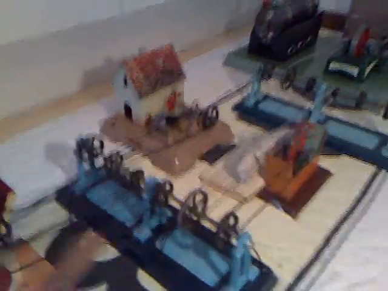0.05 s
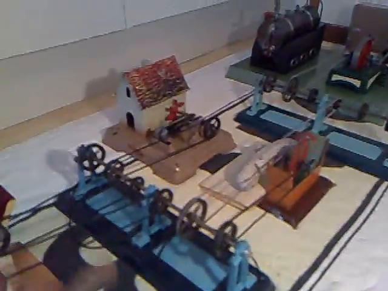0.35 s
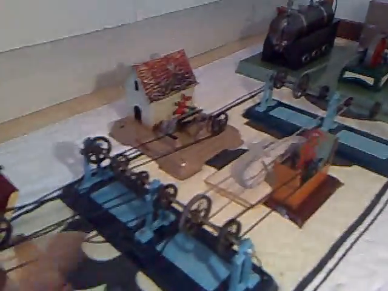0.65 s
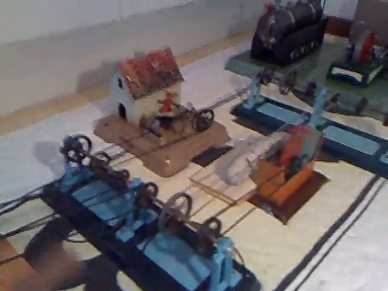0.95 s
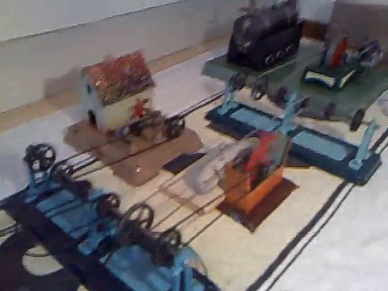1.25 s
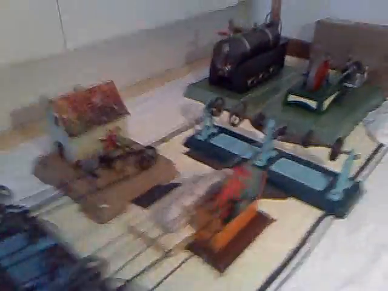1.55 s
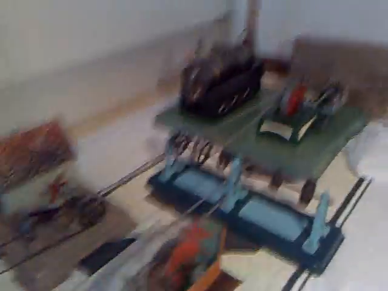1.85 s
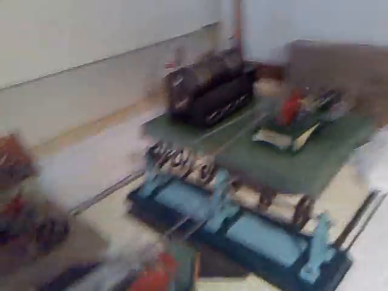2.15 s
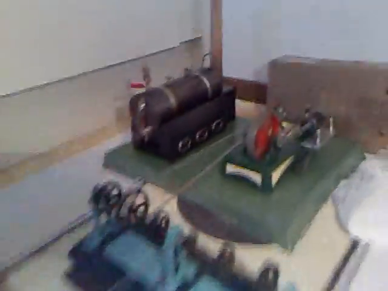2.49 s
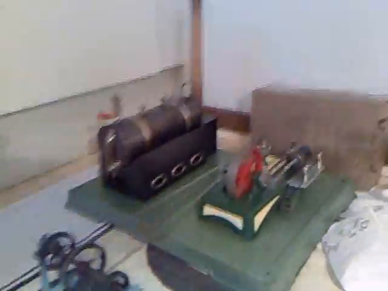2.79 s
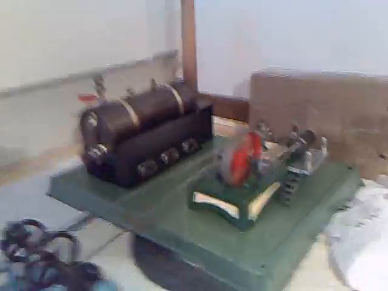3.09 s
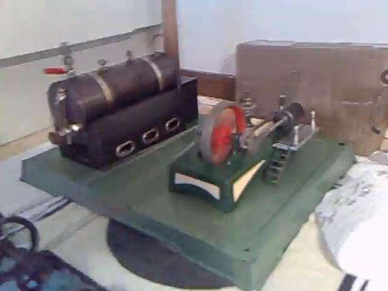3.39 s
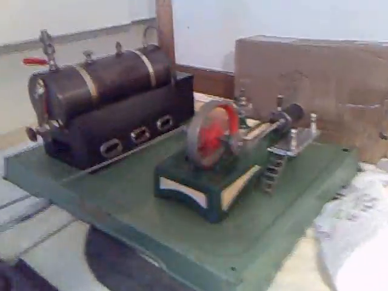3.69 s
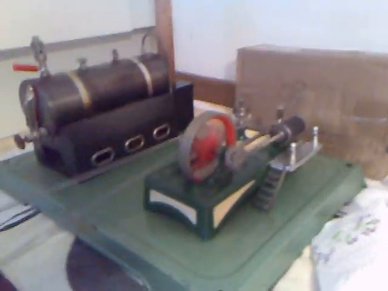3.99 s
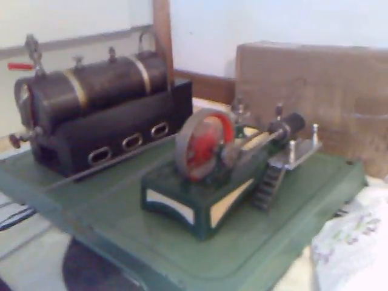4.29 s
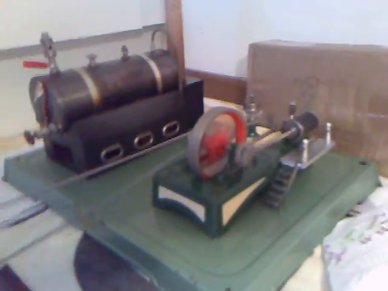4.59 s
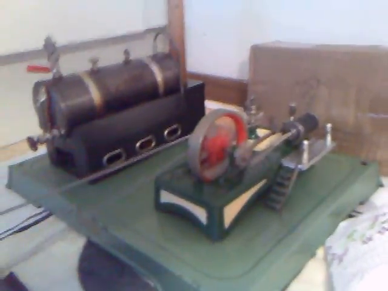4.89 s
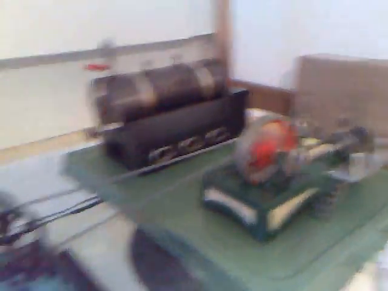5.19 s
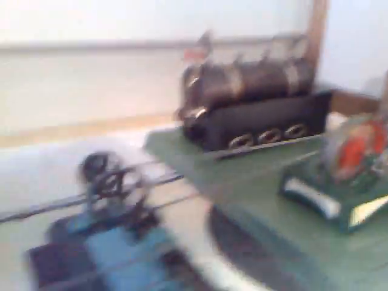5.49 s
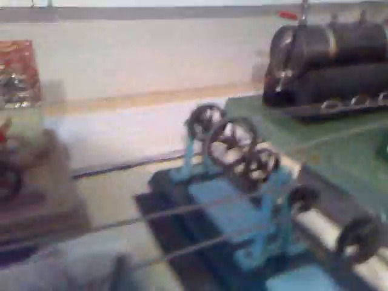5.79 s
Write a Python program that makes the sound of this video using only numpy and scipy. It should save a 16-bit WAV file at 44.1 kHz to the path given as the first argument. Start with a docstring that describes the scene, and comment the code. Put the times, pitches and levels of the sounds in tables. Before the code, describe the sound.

A toy steam engine runs throughout, about fifteen strokes a second, in a small room with short reflections. Each stroke combines a hollow knock on a metal base plate, a short wet spit of steam, a light brass clink and a faint, thin return puff, merging into a fast, even chatter. Loose tin on the workshop models clatters in time, while belts and pulleys tick and rustle softly underneath. For the first three seconds the microphone is among the models, a little away from the engine; a belt gives a brief rattle at about 1.3 seconds. Around 3 seconds the microphone moves beside the engine, and the knocking and steam become clearly louder. A loose metal part now buzzes with each turn, with small clanks near 3.2 and 3.4 seconds and a harder jolt at 4.1. The pace holds to the end, near 6 seconds.

```python
"""A toy steam engine turns about 15 times a second, driving line shafts and tin workshop models by belts.
Each turn gives a light knock, a spit of steam with a heavy knock that rings the base plate, and a weak
return puff. The strokes set brass clinking and loose tin clattering; pulleys rattle underneath.
In a small room, the microphone starts among the models and moves in beside the engine at about 3 s."""
import sys
import numpy as np
from scipy import signal
from scipy.io import wavfile

SR = 44100
rng = np.random.default_rng(int(sys.argv[2]) if len(sys.argv) > 2 else 0)


def dump(signal):
    """Clip the signal to [-1, 1] and save it as 16-bit WAV at the path in sys.argv[1]."""
    limited = np.clip(np.atleast_2d(signal).T, -1, 1)
    pcm = np.round(limited * 32767).astype(np.int16)
    wavfile.write(sys.argv[1], SR, pcm)


N = 257984
TIME = np.arange(N) / SR
TURN_COUNT = 86


def amp(db):
    return 10 ** (np.asarray(db) / 20)

def value_at(points, hz):
    """Join the points by straight lines on a log-frequency axis."""
    point_hz, value = np.transpose(points)
    return np.interp(np.log(hz + 1), np.log(point_hz + 1), value)

def ring(x, response):
    return signal.oaconvolve(x, response)[:N]

def high_pass(x, hz):
    return signal.sosfilt(signal.butter(3, hz, "high", fs=SR, output="sos"), x)

def colour(x, spectrum, size=4096):
    """Causal filter of unit energy: the spectrum sets only the tone colour."""
    log_gain = np.log(amp(value_at(spectrum, abs(np.fft.fftfreq(size, 1 / SR)))))
    minimum_phase = np.exp(np.conj(signal.hilbert(log_gain)))
    taps = np.fft.ifft(minimum_phase).real[:size // 2]
    return ring(x, taps / np.linalg.norm(taps))

def blows(start_s, level_db):
    """Single pushes at the given times."""
    at = np.round(start_s * SR).astype(int)
    inside = (at >= 0) & (at < N)
    return np.bincount(at[inside], amp(level_db)[inside], N)

def scatter(spread):
    """One random value for each turn."""
    return spread * rng.standard_normal(TURN_COUNT)

def burst(peak_s, sharpness, samples=SR // 10):
    """An envelope that swells to 1 at peak_s and dies away."""
    age = TIME[:samples] / peak_s
    return (age * np.exp(1 - age)) ** sharpness

def grains(per_s, spread_db):
    """Random tiny impacts of uneven size, at unit RMS."""
    size = amp(spread_db * np.minimum(rng.exponential(1, N), 4)) * rng.choice([-1, 1], N)
    impacts = size * (rng.random(N) < per_s / SR)
    return impacts / np.sqrt(np.mean(impacts ** 2) + 1e-20)


# The microphone's path: time_s, nearness
MIC_PATH = [(0, 0.041), (1.4, 0.15), (2.2, 0.076), (2.8, 0.032), (3.1, 0.43), (3.4, 1), (4.1, 0.96),
            (5.0, 0.88), (5.4, 0.77), (5.85, 0.93)]
def nearness(time_s):
    """Where the microphone is: 0 (far) among the models, 1 (near) beside the engine."""
    return np.clip(np.interp(time_s, *np.transpose(MIC_PATH)), 0, 1)

# Decay of the small room: frequency_hz, t60_s
ROOM_DECAY = [(200, 0.17), (700, 0.13), (2000, 0.16), (7000, 0.3), (16000, 0.076)]
def room(x, wet_db, first_s=0.0018, count=3):
    """Dense reflections, each band dying at its own speed; their pattern shifts in a one-second cycle."""
    shape = (count, SR // 2)
    reflections = rng.standard_normal(shape) * (rng.random(shape) < 4000 / SR)
    reflections *= TIME[:SR // 2] > first_s
    hz, t, bands = signal.stft(reflections, SR, nperseg=256)
    tails = signal.istft(bands * amp(-60 * t / value_at(ROOM_DECAY, hz)[:, None]), SR)[1]
    shares = np.sqrt(2 / count) * np.cos(2 * np.pi * (TIME + np.arange(count)[:, None] / count))
    wet = sum(ring(x * share, tail / np.linalg.norm(tail)) for share, tail in zip(shares, tails))
    return x + amp(wet_db) * wet

# The room's own noise: frequency_hz, gain_db
AIR_SPECTRUM = [(20, 14.5), (85, -27), (130, -21), (180, 11), (225, 0), (300, 0), (2000, -22), (16000, -12)]
def room_tone(hum_hz=51.5):
    """Low room noise and a faint mains hum, a little louder beside the engine."""
    air = amp(-77) * colour(rng.standard_normal(N), AIR_SPECTRUM)
    hum = amp(-90) * np.sqrt(2) * np.sin(2 * np.pi * hum_hz * TIME)
    return (air + hum) * amp(-2 + 3.3 * nearness(TIME))

# Pulleys on the line shafts: frequency_hz, gain_db
PULLEY_SPECTRUM = [(100, -26), (180, -16.5), (305, -17), (345, -4), (400, -2.5), (480, 5), (720, 4),
                   (790, -2.5), (1400, -2), (3200, -8), (7000, -10), (8800, -23), (12800, -25.5),
                   (13700, -13), (14500, -36)]
# A belt snatches and a pulley rattles on: start_s, level_db
BELT_SNATCHES = [(1.326, -46), (1.39, -54), (3.436, -62), (4.114, -53)]
def pulleys():
    """Belts and dry bearings of the line shafts tick and rustle without pause."""
    rubbing = amp(-57.5 + 5.7 * nearness(TIME))
    snatches = ring(blows(*np.transpose(BELT_SNATCHES)), burst(peak_s=0.0058, sharpness=2.3))
    ticks = grains(per_s=1500, spread_db=2.5) * (rubbing + snatches)
    return room(colour(ticks, PULLEY_SPECTRUM), wet_db=-1.5)

# Each belt-driven shaft loads the engine once per revolution: period_turns, heaviest_turn
SHAFT_LOADS = [(4.531, .02), (3.003, 1.19)]
# Slow drift in how hard the engine works: time_s, steam_db, knock_db
ENGINE_EFFORT = [(0, -2.5, -1.5), (.65, 0, -0.5), (.9, -0.5, -2.5), (1.4, -1.7, -0.5), (1.75, -4.5, 1.5),
                 (1.95, 0, -3.5), (2.45, -1, 1.5), (3.1, -1, 0.2), (3.45, 0, -2), (3.7, -3.8, -2),
                 (3.95, 1.5, .3), (5.85, 0.7, 0.5)]
# How hard a turn drives each sound: far_db, near_gain_db, load_share, scatter_db
EXHAUST_DRIVE = (-46, 7.5, 1.49, 0.78)
KNOCK_DRIVE = (-40, 8, 0.48, 1.65)
CLATTER_DRIVE = (-49.5, 7.5, .5, 0.25)
# The engine jolts or falters: time_s, extra_steam_db, extra_knock_db, extra_clatter_db
JOLTS = [(.08, 3, -0.5, 0), (.77, -.5, 0, 3), (.84, .8, 1, 3), (1.04, -3.5, -1.5, -1), (1.11, 0.5, -1.5, 2),
         (1.32, 4.5, 1, -3), (2.34, 5, -1, 4.5), (2.47, 5.5, 2.5, 0), (2.68, 6.5, 3.5, -11),
         (2.95, 5, 4.5, -3.5), (3.02, 5, 2, 0), (3.43, 1.5, -1.5, 3.5), (4.10, 5, 5.5, 7.5),
         (4.24, -5.5, 1, -3), (4.64, 2, 1, -1.5), (4.57, -2.5, 2, -4), (4.98, -3, -0.5, 3),
         (5.11, -3, 0, -2), (5.18, 1.5, 3, 4.5)]
def strokes(first_s=0.0144, turns_per_s=14.5644, turns_per_s2=0.05578, uneven_s=0.00036):
    """The flywheel slowly gathers speed: each stroke's time and its steam, knock and clatter in dB."""
    turn = np.arange(TURN_COUNT)
    speed = np.sqrt(turns_per_s ** 2 + 2 * turns_per_s2 * turn)
    stroke_s = first_s + (speed - turns_per_s) / turns_per_s2
    load_db = 0.8 * sum(np.cos(2 * np.pi * (turn - heaviest) / period)
                        for period, heaviest in SHAFT_LOADS)
    drives = (EXHAUST_DRIVE, KNOCK_DRIVE, CLATTER_DRIVE)
    levels = np.array([far_db + gain_db * nearness(stroke_s) + share * load_db + scatter(scatter_db)
                       for far_db, gain_db, share, scatter_db in drives])
    effort_s, *efforts = np.transpose(ENGINE_EFFORT)
    steam_db, knock_db = (np.interp(stroke_s, effort_s, effort) for effort in efforts)
    levels += [steam_db, knock_db, 1.1 * steam_db]  # the clatter follows the steam
    for time_s, *extra_db in JOLTS:
        levels[:, np.argmin(abs(stroke_s - time_s))] += extra_db
    return stroke_s + scatter(uneven_s), *levels

# The knocks within one turn: delay_s, push_db, shake_db
TURN_KNOCKS = [(-.0082, -12, -5), (.0033, 0, 0), (.0206, -13.5, -9), (.036, -30, -14)]
def knocks(stroke_s, knock_db, table_hz=115):
    """Play in the crank bearing and linkage: light knocks around the heavy one as the piston reverses."""
    push = sum(blows(stroke_s + delay_s + scatter(0.0001), knock_db + push_db + scatter(0.5))
               for delay_s, push_db, _ in TURN_KNOCKS)
    table_top = burst(peak_s=0.0025, sharpness=1.3) * np.sin(2 * np.pi * table_hz * TIME[:SR // 10])
    ringing = room(base_plate(push), wet_db=-19, first_s=0.012)
    return amp(-7) * ringing + amp(-37.5) * ring(push, table_top)

# Base plate and table, heard from among the models: pitch_hz, level_db, peak_s
FAR_PLATE = [(352.7, -21, 0.03), (448.6, -10, 0.021), (504.2, 0.5, 0.012), (539, -0.5, 0.0059),
             (575, -4.5, 0.0034), (711, -9.5, 0.019), (904.6, -2.5, 0.0052), (1000, -11.5, 0.01),
             (1281, -12.5, 0.013), (1765, -11.5, 0.0054), (2410, -31, 0.0035)]
# Base plate, microphone beside the engine: pitch_hz, level_db, peak_s
NEAR_PLATE = [(357.9, -9, 0.018), (472.3, -8, 0.027), (502.5, 3, 0.0048), (585, 2.5, 0.0041),
              (691.4, -10, 0.012), (704.5, -13.5, 0.027), (902, -3, 0.0057), (1026, -17, 0.0063),
              (1343, -23, 0.014), (1366, -21.5, 0.023), (1632, -11.5, 0.0057), (2460, -40, 0.013)]
def base_plate(push):
    """Each mode builds up as the bending wave spreads over the plate, then dies away."""
    near = nearness(TIME)
    ringing = np.zeros(N)
    for share, modes in ((1 - near, FAR_PLATE), (near, NEAR_PLATE)):
        response = sum(amp(db) * burst(peak_s, 1.5, SR // 5) * np.sin(2 * np.pi * hz * TIME[:SR // 5])
                       for hz, db, peak_s in modes)
        ringing += ring(push * share, response)
    return high_pass(ringing, hz=224)  # so small a plate radiates no bass

# Loose tin on the models and on the engine, each from close by: frequency_hz, gain_db
MODEL_TIN = [(250, -33), (480, -1), (790, -13), (900, -5.5), (1220, 0.5), (1302, 6), (1400, -2), (1800, -2),
             (2150, -17.5), (2370, -1), (2650, -4.5), (3400, -11.5), (4400, -6), (14000, -21.5)]
ENGINE_TIN = [(250, -30), (480, -1), (790, -18.5), (900, 13.5), (1150, -5), (1410, 10.5), (1560, -3),
              (1800, 1.5), (2150, -8), (2490, -3.5), (3200, -5.5), (4300, -5.5), (6000, -14), (14000, -41)]
def tin_clatter(stroke_s, clatter_db):
    """Each knock shakes loose tin parts into a brief flurry of contacts."""
    shake = sum(blows(stroke_s + delay_s - 0.0022 + scatter(0.00025), clatter_db + shake_db + scatter(1))
                for delay_s, _, shake_db in TURN_KNOCKS)
    contacts = ring(shake, burst(peak_s=0.0026, sharpness=1)) * grains(per_s=2800, spread_db=2.5)
    near = nearness(TIME)
    tin = colour(contacts * (1 - near), MODEL_TIN) + amp(0.5) * colour(contacts * near, ENGINE_TIN)
    return room(high_pass(tin, hz=650), wet_db=-2)

# Steam at the exhaust port: frequency_hz, gain_db
STEAM_SPECTRUM = [(200, -62), (900, -43), (2000, -4), (3200, -8), (4300, -4), (4800, -7.5), (5200, 2),
                  (5600, -2.5), (6700, 3), (7600, -0.5), (8700, -12.5), (11000, -17), (13700, -18),
                  (16000, -26)]
def exhaust(stroke_s, steam_db):
    """The port opens once a turn and spits wet steam."""
    openings = blows(stroke_s - 0.0003 + scatter(0.0013), steam_db)
    flow = ring(openings, burst(peak_s=0.0052, sharpness=2.33))
    steam = amp(1.5) * colour(flow * grains(per_s=14000, spread_db=1), STEAM_SPECTRUM)
    return room(steam, wet_db=-6.5, first_s=0.0032)

# A loose part on the engine, from close by: frequency_hz, gain_db
CLANK_SPECTRUM = [(700, -57), (1150, -14.5), (1340, -3.5), (1430, 0.5), (1560, -16.5), (2200, -39.5)]
# Its hard swings: start_s, level_db
HARD_SWINGS = [(3.232, -5), (3.43, -2), (3.452, -7.5), (4.125, -3)]
def clank(stroke_s, clatter_db):
    """A loose part on the engine buzzes with every turn and now and then swings hard against its seat."""
    buzz = ring(blows(stroke_s, clatter_db + 28.5), burst(peak_s=0.011, sharpness=0.9))
    swings = ring(blows(*np.transpose(HARD_SWINGS)), burst(peak_s=0.0078, sharpness=1))
    contacts = (buzz + swings) * nearness(TIME) * grains(per_s=3000, spread_db=1.5)
    return amp(-40.5) * colour(contacts, CLANK_SPECTRUM)

# Cylinder and steam pipe, from the models and from beside the engine: pitch_hz, far_db, near_db
BRASS_RING = [(2330, 0, -14), (2463, -31, -3), (4290, -14, 2.5), (4510, 1, -17), (5070, -4, 3.5),
              (6020, 1, -5), (6270, 6, -19), (6580, -11, 5.5), (6840, -10, 4), (7530, -4, -0.5)]
def brass_clink(stroke_s, steam_db, rise_s=0.0023, t60_s=0.045):
    """Each stroke sets the brass ringing briefly, its modes a little differently every time."""
    t, near = TIME[:SR // 10], nearness(stroke_s)
    envelope = (1 - np.exp(-t / rise_s)) * amp(-60 * t / t60_s)
    ringing = np.zeros(N)
    for hz, far_db, near_db in BRASS_RING:
        strike_db = steam_db + far_db + (near_db - far_db) * near + scatter(2.5)
        ringing += ring(blows(stroke_s + 0.002, strike_db), envelope * np.sin(2 * np.pi * hz * t))
    return amp(-5) * ringing

# Steam slipping past the valve: frequency_hz, gain_db
LEAK_SPECTRUM = [(500, -38), (3000, -11.5), (7000, 8.5), (8800, -9), (11000, 0), (13700, -8), (16000, -4.5)]
def valve_leak(stroke_s):
    """On the return stroke a thin, bright puff escapes past the valve."""
    puffs = blows(stroke_s + 0.037 + scatter(0.00086), -57 + 3.9 * nearness(stroke_s) + scatter(1.8))
    flow = ring(puffs, burst(peak_s=0.0056, sharpness=4.3))
    return room(colour(flow * rng.standard_normal(N), LEAK_SPECTRUM), wet_db=-20)


def scene():
    """Engine, models and room at one moving microphone."""
    stroke_s, steam_db, knock_db, clatter_db = strokes()
    engine = knocks(stroke_s, knock_db) + exhaust(stroke_s, steam_db) + brass_clink(stroke_s, steam_db)
    engine += valve_leak(stroke_s) + clank(stroke_s, clatter_db)
    return (engine + tin_clatter(stroke_s, clatter_db) + pulleys() + room_tone())[None]

def record(dry, edge_hz=15900):
    """The recorder's band limit."""
    low_pass = signal.firwin(511, edge_hz, window=("kaiser", 9), fs=SR)
    return signal.oaconvolve(dry, low_pass[None], "same")


dry = scene()
out = record(dry)
dump(out)
```